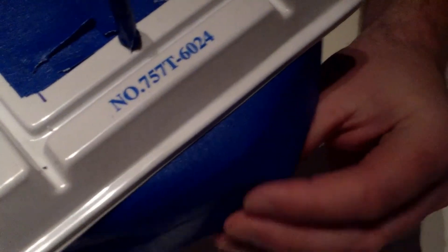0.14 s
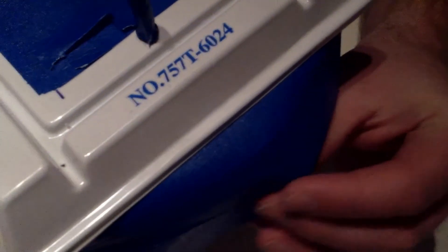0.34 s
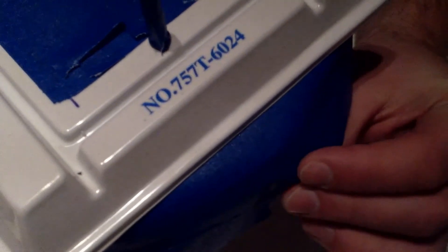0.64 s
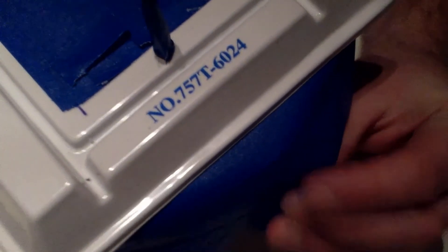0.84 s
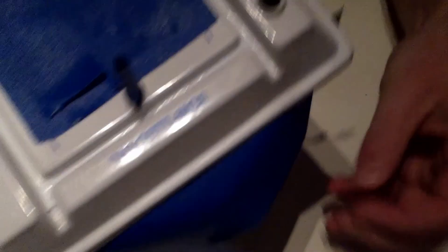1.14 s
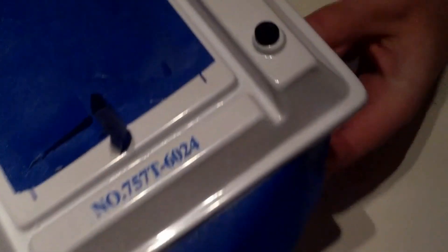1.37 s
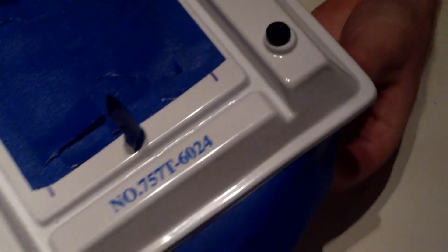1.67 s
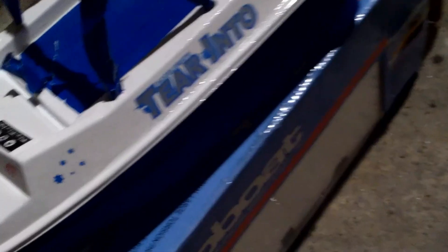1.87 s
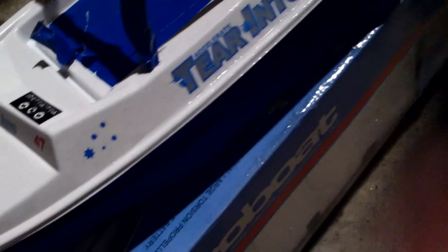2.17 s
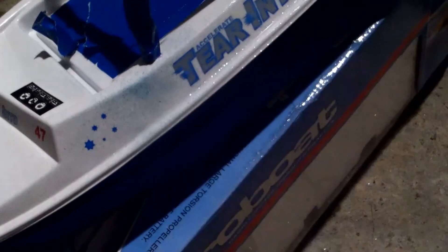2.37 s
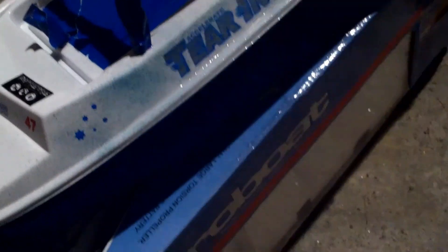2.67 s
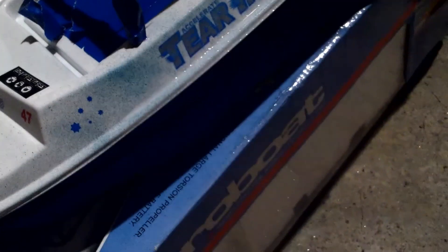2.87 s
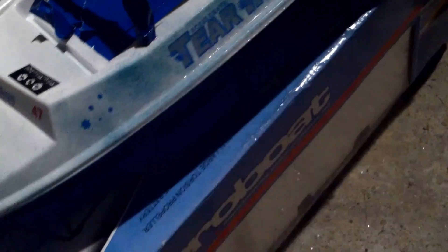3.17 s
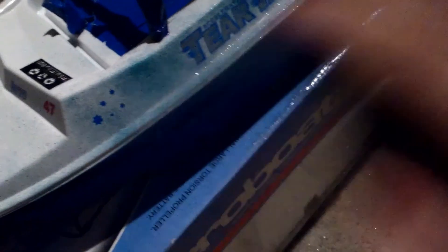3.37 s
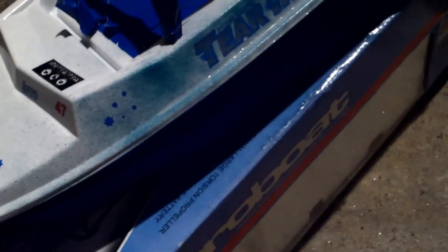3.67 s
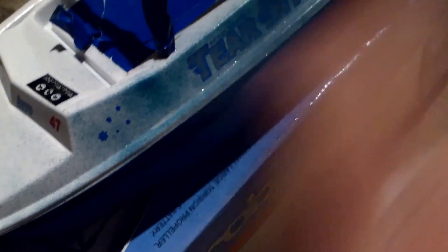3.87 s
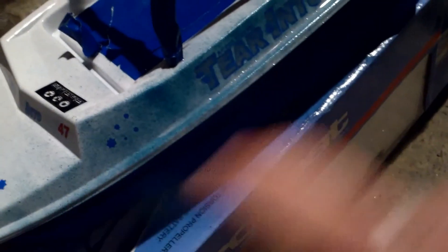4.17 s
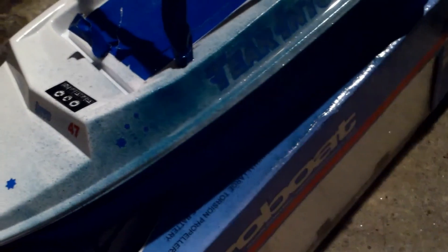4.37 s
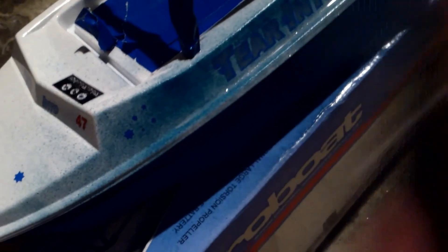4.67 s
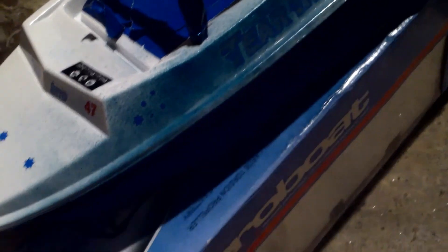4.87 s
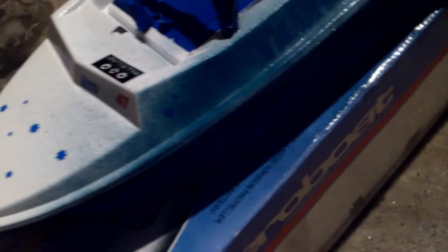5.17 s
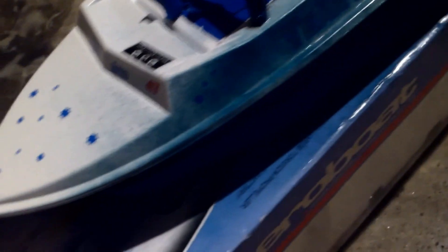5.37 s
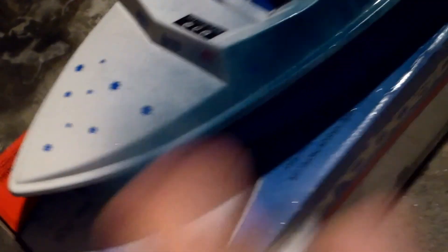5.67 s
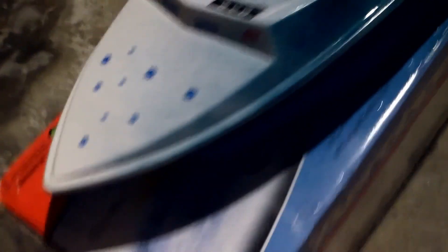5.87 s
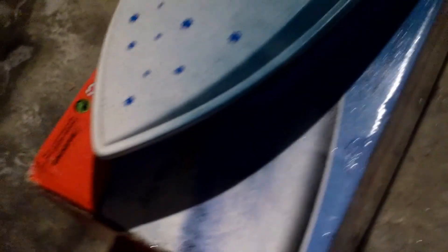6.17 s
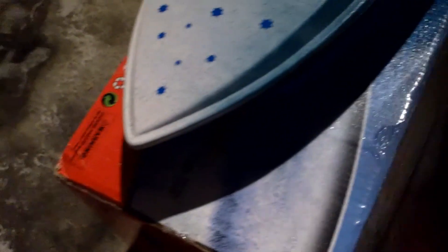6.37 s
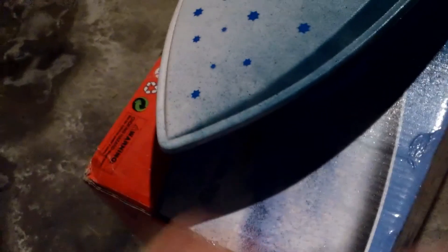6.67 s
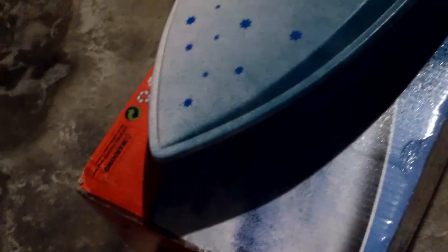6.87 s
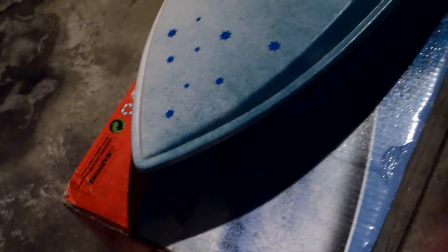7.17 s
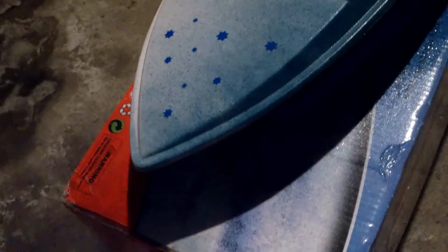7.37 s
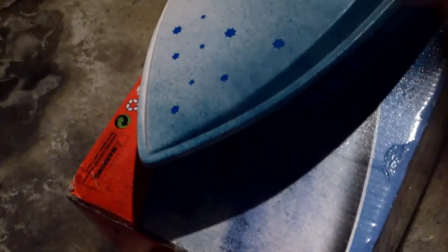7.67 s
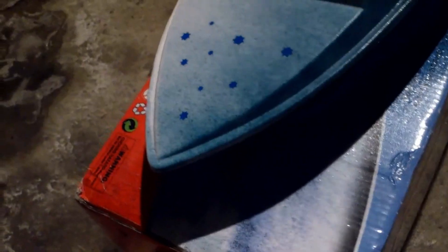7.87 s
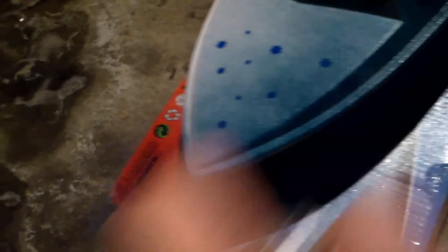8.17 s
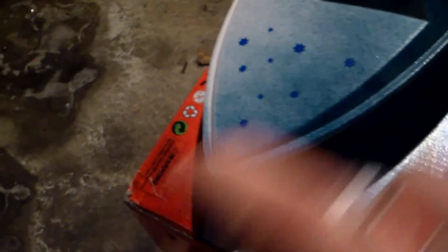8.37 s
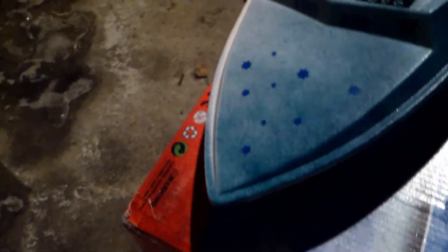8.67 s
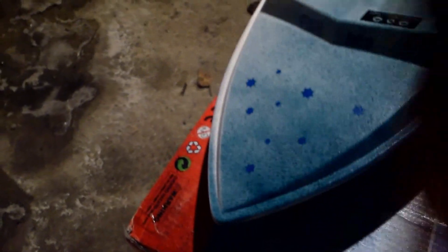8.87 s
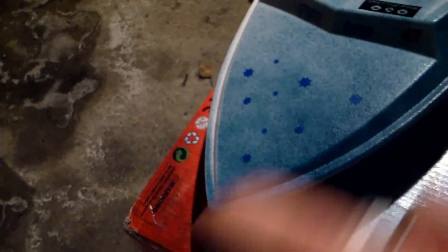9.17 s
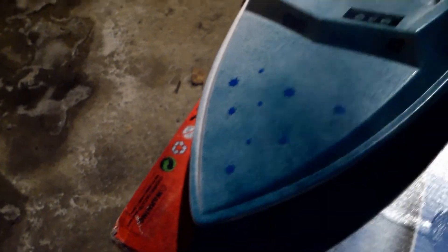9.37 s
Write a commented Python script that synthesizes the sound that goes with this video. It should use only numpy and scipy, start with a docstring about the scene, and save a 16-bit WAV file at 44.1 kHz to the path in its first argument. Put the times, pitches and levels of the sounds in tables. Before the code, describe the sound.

A thin hiss and crackling tape open the scene, ending in bright snaps and hollow knocks from a plastic hull. After a sudden change of background, an aerosol sprays in regular to-and-fro bursts, sputtering as each leaves the hull, the mixing ball tapping at the turns. Close microphone with a ringing treble, a little room, soft low throb and handling rumble.

```python
"""In a small workshop, masking tape is peeled off a plastic model boat and lets go with sharp cracks; then, over a
changed background, a spray can sweeps to and fro over the hull. Tape, spray and swirling paint are noise shaped
by level curves; cracks and spits are clicks with a scatter of smaller ones; the mixing ball taps damped sine modes.
A thin steady hiss opens the scene. The noises and clicks ring through a microphone port near 4 kHz.
Underneath lie steady hiss, handling rumble and a low throb 25 times a second."""
import sys
import numpy as np
from scipy import signal
from scipy.fft import rfft, irfft
from scipy.io import wavfile

SR = 44100
rng = np.random.default_rng(int(sys.argv[2]) if len(sys.argv) > 2 else 0)


def wav_out(sig):
    """Save sig, one row per channel (or a flat mono array), as 16-bit PCM at SR to the path in sys.argv[1]."""
    wavfile.write(sys.argv[1], SR, np.round(np.clip(np.atleast_2d(sig).T, -1, 1) * 32767).astype(np.int16))


N = 419832
TIME, HZ = np.arange(N) / SR, np.fft.rfftfreq(N, 1 / SR)
CHANGE_S = 1.852  # the background changes between peeling and spraying

# Hollow hull, spectrum ahead of the port: pitch_hz [Hz], level_db [dB per Hz, relative]
HULL_SPECTRUM = [(60, 8), (200, 3), (480, 6.5), (1100, -1.5), (2000, 3.5), (3200, -11), (4500, -18),
                 (10000, -34)]
# Bright snap of tape or nozzle, spectrum ahead of the port: pitch_hz [Hz], level_db [dB per Hz, relative]
SNAP_SPECTRUM = [(500, -22), (2500, -16.5), (3700, 9), (4800, 1.5), (6000, -10), (10000, -17)]
# Crackle and thin hiss, spectrum ahead of the port: pitch_hz [Hz], level_db [dB per Hz, relative]
CRACKLE_SPECTRUM = [(1200, -11), (2500, -6), (4600, -4), (5600, -15), (7400, -18), (10000, -17)]


def amp(db):
    """Decibels to gain."""
    return 10 ** (np.asarray(db) / 20)


def unit(x):
    """Scales to rms 1."""
    return x / np.sqrt(np.mean(x ** 2) + 1e-20)


def add(mix, start_s, sound):
    """Mixes a sound in at a time."""
    part = mix[max(round(start_s * SR), 0):][:len(sound)]
    part += sound[:len(part)]


def level(curve):
    """Gain over time from a (time_s, level_db) curve; -120 dB outside it."""
    return amp(np.interp(TIME, *np.transpose(curve), -120, -120))


def noise():
    """White noise."""
    return rng.standard_normal(N)


def drift(rate_hz):
    """Slow random wander of rms 1: noise with everything well above the rate removed."""
    return unit(irfft(rfft(noise()) / (1 + (HZ / rate_hz) ** 4), N))


def colour(spectrum, hz, peaks=()):
    """Gain of a spectrum, with any resonances of its own, heard through the microphone port."""
    # Resonances of the microphone port: pitch_hz [Hz], width_hz [Hz], peak_db [dB]
    port = [(2590, 330, 3.5), (4268, 940, 12), (6740, 170, 7.5), (7710, 730, 5)]
    spectrum_hz, spectrum_db = np.transpose(spectrum)
    ring_db = sum(peak / (1 + (2 * (hz - centre) / width) ** 2) for centre, width, peak in [*port, *peaks])
    return amp(np.interp(np.log(hz + 1), np.log(spectrum_hz), spectrum_db) + ring_db)


def coloured(drive, spectrum, band, peaks=()):
    """Filters a drive; the result has rms 1 inside the band (low Hz, high Hz)."""
    bins = rfft(drive) * colour(spectrum, HZ, peaks)
    in_band = irfft(bins * (HZ > band[0]) * (HZ < band[1]), N)
    return irfft(bins, N) / np.std(in_band)


def impulse(spectrum, peaks, size=2048):
    """Click of the given colour, minimum phase so that its energy comes first."""
    log_gain = np.log(colour(spectrum, abs(np.fft.fftfreq(size, 1 / SR)), peaks))
    return np.fft.ifft(np.exp(np.conj(signal.hilbert(log_gain)))).real


def burst(spectrum, decay_s, scatter, peaks=()):
    """A click trailed by a fast-dying scatter of smaller ones, peak 1."""
    click = impulse(spectrum, peaks)
    t = np.arange(len(click)) / SR
    trail = scatter * rng.standard_normal(len(t)) * np.exp(-t / decay_s)
    sound = signal.fftconvolve(trail + (t == 0), click)
    return sound / abs(sound).max()


def snaps():
    """Sparse clicks of random strength, about 2000 a second, scaled to rms 1."""
    return unit((rng.random(N) < 2000 / SR) * amp(5.6 * np.minimum(rng.exponential(1, N), 4)))


def gesture(start_s, hold_s, rise_s, fade_db_per_s, lean_db=0, sag_db=0):
    """Gain of one movement: it builds up, holds with a lean and a sag in the middle, then dies away."""
    gain, first = np.zeros(N), max(int(start_s * SR), 0)
    age = np.maximum(TIME[first:first + SR] - start_s, 0)
    across = np.minimum(age / hold_s, 1)
    hold_db = lean_db * (across - .5) - sag_db * np.sin(np.pi * across) ** 2
    fade_db = fade_db_per_s * np.maximum(age - hold_s, 0)
    gain[first:first + SR] = np.minimum(age / rise_s, 1) ** 1.41 * amp(hold_db - fade_db)
    return gain


def spray():
    """The nozzle hisses; on the hull the jet adds a bright splash and a lower rush; as it swings away it sputters."""
    # Spectra ahead of the port: pitch_hz [Hz], level_db [dB per Hz, relative]
    nozzle_spectrum = [(1200, -22), (2200, -1.5), (2900, -6), (3700, 1), (5200, 0.5), (6300, -33),
                       (10000, -39)]
    splash_spectrum = [(1000, -14.5), (2200, -12), (4300, -2), (5700, 3.5), (6400, -4), (8600, 1.5)]
    rush_spectrum = [(60, -2), (150, 1.5), (400, 3), (850, -0.5), (1300, 0.5), (1800, -4.5), (4000, -10)]
    # Droplets ring the top of the can: pitch_hz [Hz], width_hz [Hz], peak_db [dB]
    cap_modes = [(3700, 300, 9), (5620, 320, 11)]
    drops_per_s, sputter_db = 170, -5.5  # sputter_db is relative to the nozzle gain
    nozzle, strike, full_jet = strokes()
    hiss = nozzle * coloured(noise(), nozzle_spectrum, (3000, 5500)) * amp(-1.92 + 1.6 * drift(76))
    splash = strike * coloured(noise(), splash_spectrum, (6500, 10000)) * amp(-0.5 + .5 * drift(70))
    rush = full_jet * coloured(noise(), rush_spectrum, (300, 1500)) * amp(-9.5)
    # more sputter as the splash falls behind the nozzle hiss
    off_hull = np.clip(1 - 2 * strike / (nozzle + 1e-9), 0, 1)
    drops = (rng.random(N) < drops_per_s / SR) * rng.uniform(-0.83, 1, N)
    drop_sound = coloured(drops, nozzle_spectrum, (3000, 5500), cap_modes)
    spatter = amp(sputter_db) * nozzle * off_hull * drop_sound
    return swept((hiss + splash + rush + spatter) * amp(0.39 * drift(31)))


def strokes():
    """Gains of nozzle hiss, splash and rush as the valve opens, the jet crosses the hull and swings away."""
    # Spray strokes: start_s [s], on_hull_s [s], valve_held_s [s], hiss_db [dB, before trims],
    # jet_db [dB, before trims], lean_db [dB, start to end of crossing], sag_db [dB, mid crossing]
    stroke_table = [(2.232, 0.26, 0.29, -28.5, -33.5, 3.5, 2.5), (2.716, .21, .39, -27.5, -31.5, -7.5, 2.2),
                    (3.15, .21, 0.35, -26, -31.5, 2.5, 3), (3.562, .2, 0.27, -27, -31.5, -8.5, 4),
                    (3.981, 0.24, .35, -28, -33.5, 6, 0.5), (4.415, .215, 0.3, -27, -32, -7.5, 1.5),
                    (4.851, 0.23, .36, -28, -34.5, 5.5, -0.1), (5.274, .2, 0.62, -28, -32, -5.5, 0.5),
                    (5.735, .21, 0.38, -28, -33, 2.5, .5), (6.154, .24, 0.37, -29, -36, -15, 0),
                    (6.565, .2, 0.34, -37, -42.5, 17, -6), (6.987, 0.2, 0.32, -28.5, -33.5, -4, 0.5),
                    (7.415, 0.19, 0.34, -28.5, -34, 3.5, -1), (7.837, .19, 0.26, -28, -33, -6.5, 2),
                    (8.269, .18, .28, -27.5, -35.5, 1.5, 1), (8.673, .21, .28, -28, -34, -4, 0.7),
                    (9.099, 0.18, .29, -26.5, -33.5, -0.5, 3.5), (9.48, .2, .3, -25.5, -33, 0, 7)]
    # rise [s], fade once off the hull [dB per s]
    hiss_shape, splash_shape, rush_shape = (0.04, 78.5), (0.055, 196), (0.068, 300)
    shut_db_per_s = 188  # extra fade of the hiss once the valve is let go

    # one short dab on the nozzle
    dab = gesture(2.6005, hold_s=0.0089, rise_s=0.0016, fade_db_per_s=2500)
    nozzle, strike, full_jet = amp(-26.5) * dab, amp(-36.5) * dab, amp(-36.5) * dab
    for start_s, on_hull_s, held_s, hiss_db, jet_db, lean_db, sag_db in stroke_table:
        valve = amp(-shut_db_per_s * np.clip(TIME - start_s - held_s, 0, 1))
        nozzle += amp(hiss_db) * gesture(start_s, on_hull_s, *hiss_shape, lean_db, sag_db) * valve
        strike += amp(jet_db) * gesture(start_s, on_hull_s, *splash_shape, lean_db, sag_db)
        full_jet += amp(jet_db) * gesture(start_s, on_hull_s, *rush_shape, lean_db, sag_db)
    return nozzle, strike, full_jet


def swept(x):
    """Near reflections whose paths change as the can moves, so that a comb wanders through the hiss."""
    # Hull and bench throw the hiss back: delay_s [s, mean], gain [ratio]
    echoes = [(.00122, .3), (.0025, .2)]
    out = x.copy()
    for delay_s, gain in echoes:
        moving_delay = delay_s * (1 + .07 * drift(2))
        out += gain * np.interp(TIME - moving_delay, TIME, x)
    return out


def sputter():
    """Wet spits of the nozzle, and the narrow band of noise that the jet sings on the edge of the bow."""
    # The nozzle spits a blob of paint: start_s [s], level_db [dB, before a shared trim]
    spits = [(3.5875, -14), (6.276, -11), (6.778, -10), (7.6612, -7), (8.301, -9)]
    # The jet crosses the edge of the bow with a falling swish: time_s [s], pitch_hz [Hz], level_db [dB]
    swish = [(6.171, 4100, -36), (6.22, 3800, -33), (6.275, 3310, -28.5), (6.31, 2880, -55)]
    out = np.zeros(N)
    for start_s, level_db in spits:
        add(out, start_s, amp(level_db - 3) * burst(SNAP_SPECTRUM, decay_s=0.0018, scatter=0.18))
    time_s, pitch_hz, level_db = np.transpose(swish)
    phase = 2 * np.pi * np.cumsum(np.interp(TIME, time_s, pitch_hz)) / SR
    # two slow noises on a gliding carrier make the narrow band
    band = unit(drift(330) * np.cos(phase) + drift(330) * np.sin(phase))
    return out + level(np.transpose([time_s, level_db])) * band


def ball():
    """The ball rings the paint-damped can, a little differently at every tap; the paint swirls as the can is lifted."""
    # The ball taps as a stroke turns: start_s [s], level_db [dB, before a shared trim],
    # rebound_s [s after the tap, 0 for none]
    taps = [(2.578, -14.5, 0), (3.006, -20.5, 0), (3.426, -22.5, 0.019), (3.8099, -21.5, 0.015),
            (4.3078, -23, 0.035), (4.6815, -27, 0.028), (5.135, -23, 0.019), (5.519, -23, 0.011),
            (5.583, -27.5, 0), (5.68, -33, 0.012), (6.0182, -21.5, 0.026), (6.4466, -29, 0),
            (6.825, -22.5, 0.034), (7.23, -25.5, .0598), (7.7007, -31, 0), (8.0265, -17.5, 0),
            (8.0853, -29, 0.0098), (8.52, -24, 0.019), (8.926, -25, 0.064)]
    # Modes of the can: pitch_hz [Hz, before detuning], level_db [dB, relative], t60_s [s]
    can_modes = [(2950, -14.5, .02), (3840, 0, 0.023), (4200, 8.5, 0.015), (5466, 5.5, 0.015),
                 (7600, -19.5, 0.017)]
    # Paint swirling as the can is lifted and before the first stroke: time_s [s], level_db [dB]
    swirl_curve = [(1.85, -40), (1.88, -49), (1.93, -33), (1.96, -43), (2.0, -31.5), (2.04, -64),
                   (2.14, -60), (2.22, -46), (2.27, -57)]
    rebound_db = -1  # relative to the first tap
    out, t = np.zeros(N), np.arange(SR // 20) / SR
    pitch_hz, mode_db, t60_s = np.transpose(can_modes)[:, :, None]
    rebounds = [(s + gap_s, level_db + rebound_db, 0) for s, level_db, gap_s in taps if gap_s > 0]
    for start_s, level_db, _ in [*taps, *rebounds]:
        spot, detune = rng.standard_normal((2, len(can_modes), 1))
        decay = amp(mode_db + 3.2 * spot - 60 * t / t60_s)
        ring = (decay * np.sin(2 * np.pi * pitch_hz * (1 + 0.013 * detune) * t)).sum(0)
        ring *= 1 - np.exp(-t / 0.00032)  # softened attack
        add(out, start_s, amp(level_db + 6.5) * ring / abs(ring).max())
    swirl = coloured(noise(), [(2500, -24), (4200, -5.5), (5100, -1.0), (6500, -26.5)], (3500, 6000))
    return out + level(swirl_curve) * swirl


def tape():
    """Glue threads snap in a dense crackle as the tape is tugged; the fingers rub the hollow hull."""
    # Tugs of varying strength, some strong, some faint: start_s [s], length_s [s], crackle_db [dB],
    # rub_db [dB], lean_db [dB, start to end]
    tugs = [(-.02, 0.057, -33.5, -40.5, -6), (0.343, 0.051, -31, -44.5, -1), (0.416, 0.054, -39.5, -47, 1),
            (0.555, .09, -31.5, -40.5, 9), (1.037, 0.18, -32.5, -42.5, 11), (1.23, 0.042, -59, -45, 7),
            (1.3, 0.16, -50.5, -80, 1), (1.726, 0.12, -55, -70, 12)]
    glue = coloured(snaps() + noise(), CRACKLE_SPECTRUM, (3300, 5200))
    rub = coloured(noise() * amp(2.0 * drift(120)), HULL_SPECTRUM, (300, 2000))
    out = np.zeros(N)
    for start_s, length_s, crackle_db, rub_db, lean_db in tugs:
        pull = gesture(start_s, length_s, rise_s=0.011, fade_db_per_s=420, lean_db=lean_db)
        out += pull * (amp(crackle_db) * glue + amp(rub_db) * rub)
    return out


def cracks():
    """The tape lets go in jerks: each a bright snap and a knock whose pitch depends on the spot of the hull."""
    # Cracks and hull knocks: start_s [s], snap_db [dB, before a shared trim],
    # knock_db [dB, before a shared trim], knock_hz [Hz]
    crack_table = [(0.4273, -14, -42, 3400), (0.4476, -8, -30, 3320), (0.8167, -26, -22, 2000),
                   (0.833, -23, -36, 528), (0.877, -28, -34, 2000), (0.8934, -31, -26.5, 450),
                   (1.0991, -19, -33, 3020), (1.1354, -17, -28, 506), (1.1489, -10, -17, 2590),
                   (1.1622, -4, -39, 3400), (1.168, -7, -32, 3400), (1.1735, -13, -28, 2010),
                   (1.1958, -3.5, -19, 3350), (1.2097, -2, -17, 1600), (1.2134, -3, -14, 3180),
                   (1.287, -20, -27, 2900)]
    out = np.zeros(N)
    for start_s, snap_db, knock_db, knock_hz in crack_table:
        snap = burst(SNAP_SPECTRUM, decay_s=0.0018, scatter=0.88)
        spot = [(knock_hz, 0.26 * knock_hz, 11)]
        knock = burst(HULL_SPECTRUM, decay_s=0.0019, scatter=0.27, peaks=spot)
        add(out, start_s, amp(snap_db + 3.0) * snap)
        add(out, start_s, amp(knock_db + 9.0) * knock)
    return out


def nudges():
    """Dull scuffs of the hollow hull: low noise that swells and dies within 80 ms."""
    # The hull is nudged: start_s [s], level_db [dB]
    nudge_table = [(1.535, -71), (1.77, -47), (5.766, -34.5), (5.98, -42.5), (6.528, -45)]
    swell = sum(amp(db) * np.interp(TIME - s, [0, .012, .08], [0, 1, 0]) for s, db in nudge_table)
    return swell * coloured(noise(), [(150, -7), (480, -1), (800, -8), (1500, -25), (4000, -51)], (200, 1500))


def thin_hiss():
    """A thin steady hiss with narrow resonances, fading after 0.64 s: noise roughened by sparse clicks."""
    # Resonances of the thin hiss: pitch_hz [Hz], width_hz [Hz], peak_db [dB]
    hiss_modes = [(2310, 140, 9.5), (3750, 710, 11.5), (4270, 310, -12), (4730, 320, 10.5)]
    hiss = coloured(noise() + 0.78 * snaps(), CRACKLE_SPECTRUM, (3300, 5200), hiss_modes)
    return amp(-34.5) * gesture(0, hold_s=0.64, rise_s=0.0016, fade_db_per_s=140) * hiss


def room(x, t60_s):
    """A diffuse tail of energy 1: decaying noise after a 4 ms gap."""
    t = np.arange(SR // 2) / SR
    tail = rng.standard_normal(len(t)) * amp(-60 * t / t60_s) * (t > .004)
    return signal.fftconvolve(x, tail / np.linalg.norm(tail))[:N]


def background():
    """Steady hiss, slow handling rumble and a regular soft thump; extra hiss and a faint hum until the change."""
    # Steady hiss, spectrum ahead of the port: pitch_hz [Hz], level_db [dB per Hz, relative]
    floor_spectrum = [(25, -5.5), (70, -11), (130, -16.5), (300, -22), (1000, -28.5), (2500, -31),
                      (4300, -34), (6500, -37.5), (10500, -34.5)]
    # Soft resonances in the hiss: pitch_hz [Hz], width_hz [Hz], peak_db [dB]
    drone_modes = [(167, 50, 4), (1525, 62, 0.5)]
    # Slow handling rumble: time_s [s], level_db [dB, before a trim]
    handling_curve = [(0.0, -31), (1.8, -41), (5.45, -41), (5.68, -27.5), (6.45, -28), (6.65, -39.5),
                      (9.52, -41)]
    # Thump before and after the change: pulse_db [dB, before centring and drift], width_s [s, Gaussian sigma]
    throb_table = [(-22, 0.0041), (-33, 0.0037)]
    throb_hz = 25
    early = TIME < CHANGE_S
    hiss = amp(-54) * coloured(noise(), floor_spectrum, (300, 10000), drone_modes)
    early_hiss = amp(-57.5) * coloured(noise(), [(100, 34.0), (600, 21.8), (10000, 5.0)], (6500, 10000)) * early
    sway = unit(irfft(rfft(noise()) * HZ ** 2 / (1 + (HZ / 12) ** 5), N))
    rumble = amp(-2.0) * level(handling_curve) * sway
    # time from the nearest thump
    offset = ((TIME - .0068) * throb_hz + .5) % 1 / throb_hz - .5 / throb_hz
    before, after = (amp(db) * np.exp(-.5 * (offset / width_s) ** 2) for db, width_s in throb_table)
    throb = np.where(early, before - before.mean(), after - after.mean()) * amp(0.51 * drift(17))
    hum = amp(-52.0) * np.sin(2 * np.pi * 333 * TIME) * early
    return hiss + early_hiss + rumble + throb + hum


def scene():
    """Close sources, workshop tail and background in the middle; a very short diffuse smear, opposite left and right."""
    # Level of the left-right smear: pitch_hz [Hz], level_db [dB]
    smear_spectrum = [(100, -14.5), (500, -19), (1500, -13), (2600, -17.5), (4300, -28.5), (6500, -14.5),
                      (10000, -19.5)]
    close = spray() + sputter() + ball() + tape() + cracks() + nudges() + thin_hiss()
    mid = close + amp(-15.5) * room(close, t60_s=0.31) + background()
    smear_hz, smear_db = np.transpose(smear_spectrum)
    smear_gain = amp(np.interp(np.log(HZ + 1), np.log(smear_hz), smear_db))
    smear = irfft(rfft(room(close, t60_s=0.011)) * smear_gain, N)
    return np.array([amp(-0.68) * (mid + smear), amp(-0.47) * (mid - smear)])


def record(dry):
    """Peaks flatten at a ceiling, then a steep lowpass removes the top of the treble."""
    ceiling, edge_hz = .88, 10540
    lowpass = signal.firwin(1023, edge_hz, window=("kaiser", 8), fs=SR)
    return signal.oaconvolve(np.clip(dry, -ceiling, ceiling), lowpass[None], "same", axes=1)


dry = scene()
out = record(dry)
wav_out(out)
```